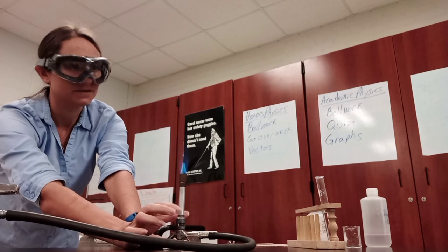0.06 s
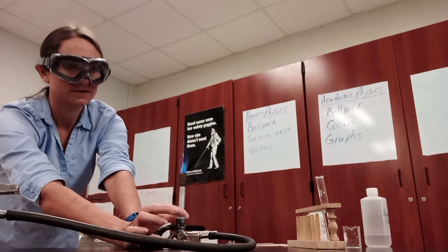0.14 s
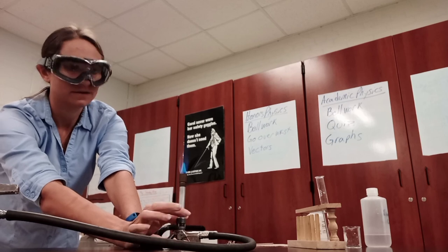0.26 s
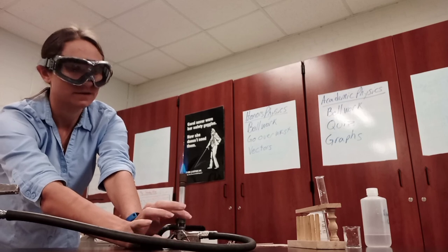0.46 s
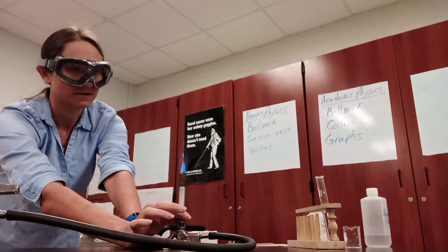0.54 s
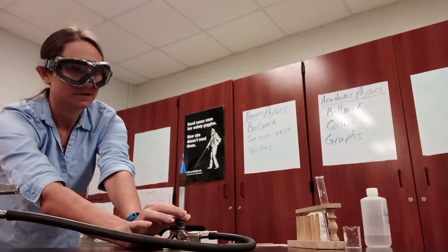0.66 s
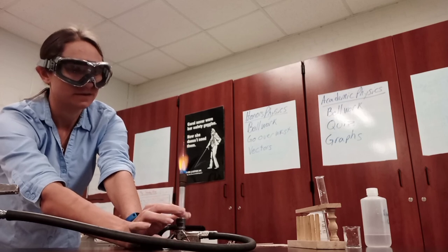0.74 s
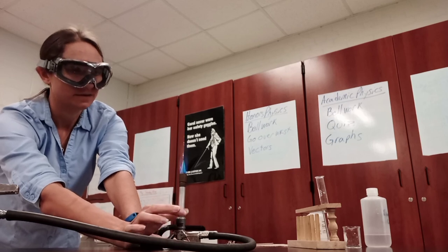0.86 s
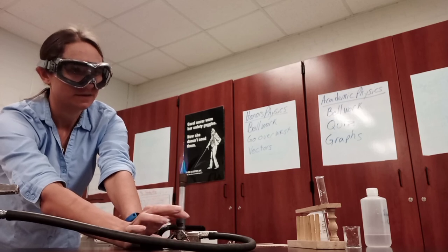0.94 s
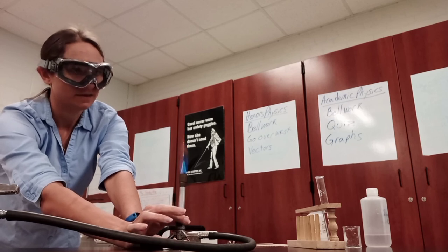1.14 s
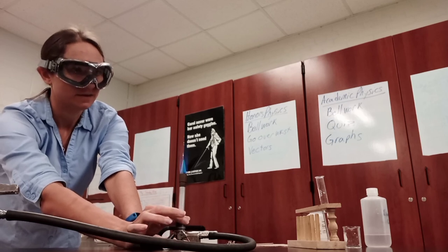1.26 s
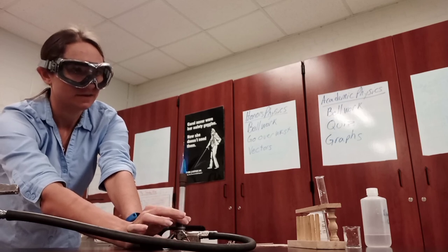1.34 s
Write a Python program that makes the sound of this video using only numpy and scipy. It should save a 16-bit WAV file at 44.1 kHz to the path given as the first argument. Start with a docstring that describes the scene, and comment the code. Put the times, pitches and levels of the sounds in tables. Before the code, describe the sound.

A metal gas burner is adjusted by hand: its base knocks on a bench, the collar rasps and squeaks in quick jerks, then softer knocks and one last squeak follow, close by in a hard room with faint hum.

```python
"""Out of faint crackle, a gas burner's base knocks on a laboratory bench as a hand turns its collar.
The dry metal thread rasps in quick jerks that set the tube ringing, then catches in short stick-slip
squeaks and dull chirps. More knocks and scuffs of the base follow, and one last squeak.
A hard room rings after the burner, over a low hum and a thin steady whistle."""
import sys
import numpy as np
from scipy import signal
from scipy.fft import rfft, irfft
from scipy.io import wavfile
from scipy.ndimage import uniform_filter1d

SR = 44100
rng = np.random.default_rng(int(sys.argv[2]) if len(sys.argv) > 2 else 0)


def store_pcm(level_fs):
    """Save levels as 16-bit WAV."""
    pcm = np.round(np.clip(level_fs, -1, 1) * 32767).astype(np.int16)
    wavfile.write(sys.argv[1], SR, np.atleast_2d(pcm).T)


N = 61739


def amp(db):
    """Decibels to gain."""
    return 10 ** (np.asarray(db) / 20)


def unit_rms(x):
    """Scales to an rms of one."""
    return x / np.sqrt(np.mean(x ** 2) + 1e-20)


def curve_at(points, hz):
    """Reads a curve on a log-frequency axis."""
    freqs, values = np.transpose(points)
    return np.interp(np.log(hz + 1), np.log(freqs + 1), values)


def fader(points):
    """Gain that rides through timed level points."""
    return amp(np.interp(np.arange(N) / SR, *np.transpose(points)))


def add(mix, start_s, sound):
    """Mixes a sound in at its start time."""
    part = mix[max(round(start_s * SR), 0):][:len(sound)]
    part += sound[:len(part)]


def impulse_response(eq, size=2048):
    """Minimum-phase ring of an EQ curve, with unit energy."""
    log_gain = np.log(amp(curve_at(eq, abs(np.fft.fftfreq(size, 1 / SR)))))
    response = np.fft.ifft(np.exp(signal.hilbert(log_gain).conj())).real[:size // 2]
    return response / np.linalg.norm(response)


def noise(eq):
    """Steady noise coloured by an EQ curve."""
    gain = amp(curve_at(eq, np.fft.rfftfreq(N, 1 / SR)))
    return unit_rms(irfft(rfft(rng.standard_normal(N)) * gain, N))


def wobble(count, size=40):
    """Smooth random motion."""
    return unit_rms(uniform_filter1d(uniform_filter1d(rng.standard_normal(count), size), size))


# Hollow body and bright grit of the rasp: freq_hz, gain_db
BODY_EQ = [(30, -62.5), (150, -22), (430, -12.5), (620, 4), (790, -0.5), (930, 7.5), (1050, 5),
           (1150, -6.5), (1360, 1), (1650, -10.5), (1920, -4.5), (2800, -25), (4500, -28.5)]
GRIT_EQ = [(100, -49.5), (1000, -29.5), (2500, -10.5), (3900, -5.5), (4400, 3.5), (5100, -3.5), (5500, 5.5),
           (5900, -0.5), (6500, -0.5), (7100, -15.5), (8200, -35), (8900, -4), (10000, -9.5), (11300, 0.5),
           (11950, -20.5), (12400, -8.5), (13200, -29.5), (15000, -14.5), (15700, -4), (16300, -3)]
# Jerks and one long drag of the thread: start_s, length_s, body_db, grit_db
THREAD_JERKS = [(0.271, 0.0049, -44, -44.5), (0.314, 0.015, -39.5, -31.5), (0.368, 0.01, -56.5, -50),
                (.37, .18, -56, -51), (0.4038, 0.014, -40, -33.5), (.420, 0.0091, -30, -35.5),
                (0.437, 0.0096, -37.5, -31.5), (0.4501, 0.0088, -28.5, -31.5), (0.4652, 0.013, -37, -32),
                (0.487, 0.0089, -40, -47.5), (0.502, 0.013, -67, -48), (0.526, .007, -65.5, -45),
                (0.551, 0.014, -49, -46)]
def thread_rasps():
    """Each jerk is a cluster of tiny slips shaking the metal; the body's note sags as the jerk slows."""
    slips_per_s, spread_db = 8000, 2
    rise, fall, sag = 0.35, 0.6, 0.095  # shares of the length (rise, fall) and of the pitch (sag)
    out, n = np.zeros(N), np.arange(SR // 4)
    body_ring, grit_ring = impulse_response(BODY_EQ), impulse_response(GRIT_EQ)
    for start_s, length_s, body_db, grit_db in THREAD_JERKS:
        slipping = rng.random(len(n)) < slips_per_s / SR
        strength = amp(spread_db * rng.standard_normal(len(n)))
        direction = rng.choice([-1, 1], len(n))
        progress = n / SR / length_s
        envelope = np.clip(np.minimum(progress / rise, (1 - progress) / fall), 0, 1)
        slips = slipping * direction * strength * envelope
        speed = 1 + sag * (1 - 2 * np.minimum(progress, 1))
        body = np.interp(np.cumsum(speed), n, signal.fftconvolve(slips, body_ring)[:len(n)])
        grit = signal.fftconvolve(slips, grit_ring)
        for layer, level_db in ((body, body_db), (grit, grit_db)):
            makeup_gain = np.sqrt(length_s * SR / 2 / (np.sum(layer ** 2) + 1e-20))
            add(out, start_s, amp(level_db) * makeup_gain * layer)
    return out


def tube_ring(scrape):
    """The scrape sets the burner tube ringing in a cluster of close modes."""
    centre_hz, width_hz, t60_s, send_db = 4475, 280, 0.6, -20
    t = np.arange(SR // 2) / SR
    band = np.exp(-((np.fft.rfftfreq(len(t), 1 / SR) - centre_hz) / width_hz) ** 2)
    cluster = irfft(rfft(rng.standard_normal(len(t))) * band, len(t))
    response = cluster * amp(-60 * t / t60_s)
    return amp(send_db) * signal.fftconvolve(scrape, response / np.linalg.norm(response))[:N]


# Side tones round a squeak: pitch_multiple, chatter_multiple
SIDE_TONES = [(0, 1), (1, 1), (2, 1), (3, -1), (3, 1), (4, -1)]
# Balance of those side tones: gain_db
SIDE_GAINS = [-3, -2, 0, -2.5, -5, -15]
# Catches of the thread: peak_s, half_length_s, pitch_hz, level_db, octave_db, chatter_db, chatter_hz
THREAD_SQUEAKS = [(0.369, 0.0015, 4910, -39, -7, -18.5, 1617),
                  (0.3848, 0.0016, 4910, -37.5, -9, -14.5, 1672),
                  (0.396, 0.0029, 4530, -38.5, -3.5, -13, 1974),
                  (0.474, 0.0021, 4920, -36, -9.5, -21.5, 1739),
                  (0.4872, 0.0036, 4432, -34, 1.5, -12, 1762), (.504, 0.0029, 4466, -34.5, 5, -19, 1830),
                  (0.5093, 0.0042, 4290, -23.5, -12, -12.5, 1779), (0.526, .0028, 4393, -31, -6, -6, 1598),
                  (0.53, .0025, 4330, -33.5, -18, -7, 1625), (0.5446, 0.0032, 4430, -43, -27, -12.5, 1573),
                  (0.552, 0.0029, 4408, -40, -26.5, -5, 1464), (1.1443, 0.0029, 4344, -39, -4, -25, 1632),
                  (1.1473, 0.0035, 4314, -31, -22, -19, 1517)]
def thread_squeaks():
    """Brief stick-slip tones sag as the thread grips; a second, slower vibration adds side tones."""
    glide_depth, jitter_depth, chatter_drift, third_db = 0.011, 0.0063, 0.036, -5.5
    out, t = np.zeros(N), np.arange(-SR // 50, SR // 50) / SR
    for peak_s, half_s, pitch_hz, level_db, octave_db, chatter_db, chatter_hz in THREAD_SQUEAKS:
        glide = glide_depth * (np.exp(np.minimum(-t / half_s, 2)) - 1)
        pitch = pitch_hz * (1 + glide + jitter_depth * wobble(len(t)))
        phase = 2 * np.pi * np.cumsum(pitch) / SR
        chatter_rate = chatter_hz * (1 + chatter_drift * wobble(len(t)))
        chatter_phase = 2 * np.pi * np.cumsum(chatter_rate) / SR
        sides = sum(amp(db) * np.sin(k * phase + m * chatter_phase)
                    for (k, m), db in zip(SIDE_TONES, SIDE_GAINS))
        roughness = sides + amp(third_db) * np.sin(3 * phase)
        swell = np.exp(-(t / half_s) ** 2)
        tone = np.sin(phase) + amp(octave_db) * np.sin(2 * phase) + amp(chatter_db) * swell * roughness
        add(out, peak_s + t[0], amp(level_db) * swell * tone)
    return out


# Dull chirps and groans: peak_s, half_length_s, pitch_hz, level_db
COLLAR_CHIRPS = [(0.2671, .0034, 340, -36.5), (0.317, 0.0028, 1576, -36), (.321, 0.0035, 1028, -34),
                 (.326, 0.0049, 555, -35.5), (1.0355, 0.0022, 1554, -45), (1.147, 0.0024, 1500, -42.5)]
def collar_chirps():
    """The slower vibrations sound alone as the metal binds."""
    out, t = np.zeros(N), np.arange(-SR // 50, SR // 50) / SR
    for peak_s, half_s, pitch_hz, level_db in COLLAR_CHIRPS:
        swell = np.exp(-(t / half_s) ** 2)
        add(out, peak_s + t[0], amp(level_db) * swell * np.sin(2 * np.pi * pitch_hz * t))
    return out


def struck_modes(modes, t, rise_s):
    """Decaying sines of alternating polarity under a softened attack."""
    ringing = sum((-1) ** k * amp(gain_db - 60 * t / t60_s) * np.sin(2 * np.pi * pitch_hz * t)
                  for k, (pitch_hz, gain_db, t60_s) in enumerate(modes))
    return (1 - np.exp(-t / rise_s)) * ringing


# Low, middle and high modes of the base on the bench: pitch_hz, gain_db, t60_s
BOOM_MODES = [(202.2, -13.5, 0.19), (240, -13, 0.12), (281, -1.5, 0.091), (372, -13, 0.061)]
THUD_MODES = [(375, -9.5, 0.06), (457.2, -6, 0.11), (535.6, -1, 0.056), (609, -4, 0.071)]
CLACK_MODES = [(630, -1, 0.015), (775, -9.5, 0.038), (884, -11, 0.045), (1014, -7, 0.028),
               (1380, -5, 0.023), (1550, -15, 0.066), (1930, -7, 0.012)]
# Metallic edge of the attack: freq_hz, gain_db
TICK_EQ = [(30, -38.5), (300, -18.5), (1500, 9.5), (2600, -1), (3900, 4), (4800, -6.5), (6500, -11),
           (7600, -33.5), (9400, -15.5), (11300, -16), (13500, -30), (16000, -16.5)]
# Hits and their layer gains: start_s, boom_db, thud_db, clack_db, tick_db
BASE_HITS = [(0.2322, -59, -30.5, -34.5, -40.5), (.238, -33, -36, -53, -68), (0.2502, -34, -40, -49, -72),
             (0.2639, -33.5, -44.5, -54, -64), (0.2725, -35, -38, -33, -43.5), (.290, -34, -47.5, -45, -71),
             (0.316, -46, -38, -36, -57), (0.368, -69, -54, -38, -60), (0.9335, -70, -68, -42.5, -43.5),
             (0.9469, -70, -56, -37.5, -45), (.962, -57, -48, -55, -74), (0.9714, -54, -40, -48, -54.5),
             (.986, -42, -49, -74, -91), (1.001, -49, -51.5, -76, -84), (1.019, -50.5, -57, -57, -74),
             (1.16, -42, -46, -60.5, -73), (1.172, -50.5, -47, -52.5, -63), (1.189, -44.5, -59, -65, -84.5),
             (1.233, -60.5, -53.5, -60, -80), (1.2665, -65.5, -49, -50.5, -73)]
def base_knocks():
    """Each knock sounds the base's three groups of modes in its own blend, with a metallic tick."""
    out, t = np.zeros(N), np.arange(SR // 4) / SR
    boom = struck_modes(BOOM_MODES, t, rise_s=0.0058)
    thud = struck_modes(THUD_MODES, t, rise_s=0.0029)
    clack = struck_modes(CLACK_MODES, t, rise_s=0.00035)
    tick_ring, tick_decay_s = impulse_response(TICK_EQ), 0.003
    for start_s, boom_db, thud_db, clack_db, tick_db in BASE_HITS:
        add(out, start_s, amp(boom_db) * boom + amp(thud_db) * thud + amp(clack_db) * clack)
        burst = 0.5 * rng.standard_normal(len(t)) * np.exp(-t / tick_decay_s)
        add(out, start_s, amp(tick_db) * signal.fftconvolve(burst, tick_ring))
    return out


# Fader ride of the scuff: time_s, level_db
SCUFF_RIDE = [(0, -81), (.06, -68), (.1, -77), (.17, -73), (0.201, -78), (0.253, -43.5), (.33, -50.5),
              (.39, -80), (.6, -85), (.92, -85.5), (0.978, -54), (1.05, -63), (1.13, -63), (1.17, -50.5),
              (1.21, -67.5), (1.28, -57), (1.39, -83)]
# Hollow colour of the scuff: freq_hz, gain_db
SCUFF_EQ = [(30, -44.5), (300, -19), (450, -7), (580, 2), (700, -7), (950, -11.5), (1200, -29),
            (2500, -32.5), (8000, -66)]
def base_scuff():
    """The base shifts on the bench under the hand, with a grainy rub."""
    grain_db = 3.5
    grain = amp(grain_db * wobble(N, size=200))
    return fader(SCUFF_RIDE) * unit_rms(grain * noise(SCUFF_EQ))


# Reverb decay: freq_hz, t60_s
REVERB_DECAY = [(120, 0.41), (300, 0.6), (800, 0.28), (1800, 0.57), (4400, 0.52), (9000, 0.38),
                (16000, 0.2)]
# Reverb colour: freq_hz, gain_db
REVERB_EQ = [(100, -3), (500, -4), (1500, -4), (4400, -9.5), (9000, -11.5), (16000, -13.5)]
def room_reverb(source):
    """Dense reflections, strongest from the nearby bench and cabinets; each band dies at its own speed."""
    predelay_s, early_boost, early_decay_s = 0.0058, 3.7, 0.012
    t = np.arange(SR) / SR
    reflections = rng.standard_normal(SR) * (1 + early_boost * np.exp(-t / early_decay_s))
    hz, frame_s, bands = signal.stft(reflections, SR, nperseg=256)
    decay = amp(-60 * frame_s / curve_at(REVERB_DECAY, hz)[:, None])
    tail = signal.istft(bands * decay, SR, nperseg=256)[1][:SR] * (t > predelay_s)
    spectrum = rfft(tail)
    spectrum /= np.sqrt(uniform_filter1d(abs(spectrum) ** 2, size=200))  # flatten before the EQ
    spectrum *= amp(curve_at(REVERB_EQ, np.fft.rfftfreq(SR, 1 / SR)))
    return signal.fftconvolve(source, irfft(spectrum))[:N]


# Colour of a click: freq_hz, gain_db
CLICK_EQ = [(40, -3.5), (150, -2), (600, 8), (1300, 6.5), (2300, 7), (4000, 1.5), (5800, -3.5),
            (7300, -26.5), (12000, -38), (16000, -44)]
# Small dry clicks: start_s, click_db, rebound_db
DRY_CLICKS = [(.0072, -51, -48), (0.024, -49, -47), (.039, -51, -44), (0.0787, -48, -49), (.102, -48, -53),
              (0.1365, -51.5, -50.5), (0.1595, -49, -43), (0.171, -47.5, -44), (0.2092, -48, -53),
              (0.214, -47.5, -48), (0.2277, -39, -49), (0.2728, -30, -36.5), (.6855, -49.5, -63),
              (0.735, -48.5, -70), (0.753, -43.5, -70.5), (1.121, -43, -59), (1.2064, -48, -48),
              (1.289, -44, -66), (1.3154, -43, -63), (1.3779, -48, -62)]
def crackle():
    """Dry clicks, each with a soft rebound and a short gritty tail; fainter ones fall between them."""
    faint_per_s, faint_db = 40, -65
    rebound_peak_s, tail_db, tail_decay_s = 0.00059, -29.5, 0.019
    clicks = amp(faint_db) * (rng.random(N) < faint_per_s / SR) * rng.standard_normal(N)
    rebounds, t = np.zeros(N), np.arange(SR // 20) / SR
    rise = (t / rebound_peak_s) ** 2
    for start_s, click_db, rebound_db in DRY_CLICKS:
        tail = amp(tail_db) * rng.standard_normal(len(t)) * np.exp(-t / tail_decay_s)
        add(clicks, start_s, amp(click_db) * ((t == 0) + tail))
        add(rebounds, start_s, amp(rebound_db) * rise * np.exp(1 - rise))
    click_ring = impulse_response(CLICK_EQ)
    snaps = signal.fftconvolve(clicks, click_ring / abs(click_ring).max())[:N]
    low_cut = signal.butter(2, 122, "high", fs=SR, output="sos")
    return signal.sosfilt(low_cut, rebounds) - snaps


# Fader ride of the rustle: time_s, level_db
RUSTLE_RIDE = [(0, -58.5), (0.041, -58), (0.086, -66.5), (0.114, -61.5), (0.139, -68), (.17, -56),
               (.2, -61.5), (.27, -58), (0.359, -64.5), (.5, -63.5), (0.619, -76), (0.691, -73),
               (.75, -76.5), (.91, -80), (0.999, -61.5), (1.08, -74), (1.18, -61), (1.25, -76),
               (1.302, -83), (1.39, -75)]
# Dark colour of the rustle: freq_hz, gain_db
RUSTLE_EQ = [(20, -34), (50, -30.5), (85, -7.5), (125, 4), (170, -5.5), (300, -8), (600, -14.5),
             (1200, -24.5), (3000, -33.5), (7000, -51.5), (16000, -52.5)]
def handling_rustle():
    """Low handling noise swells and fades."""
    return fader(RUSTLE_RIDE) * noise(RUSTLE_EQ)


# Hum and whistle: pitch_hz, width_hz, level_db
STEADY_TONES = [(120, 7.2, -82), (193.4, 43, -82), (1674, 37, -79.5), (5750, 140, -85)]
# Colour of the room air: freq_hz, gain_db
AIR_EQ = [(20, -25), (60, -11.5), (130, -7), (210, 4.5), (330, -11.5), (800, -26), (1700, -16), (2800, -27),
          (4300, -22), (6000, -22), (8000, -34.5), (16000, -25)]
def room_tone():
    """Narrow bands of noise hum and whistle over a bed of air."""
    air_db = -75.5
    tones, hz = np.zeros(N), np.fft.rfftfreq(N, 1 / SR)
    for pitch_hz, width_hz, level_db in STEADY_TONES:
        band = 1 / (1 + (2 * (hz - pitch_hz) / width_hz) ** 2)
        tones += amp(level_db) * unit_rms(irfft(rfft(rng.standard_normal(N)) * band, N))
    return tones + amp(air_db) * noise(AIR_EQ)


def scene():
    """Mono mix; only the knocks, rasps, squeaks and chirps feed the reverb."""
    scrape = thread_rasps()
    burner = base_knocks() + scrape + thread_squeaks() + collar_chirps()
    foreground = burner + tube_ring(scrape) + room_reverb(burner)
    bed = crackle() + room_tone() + handling_rustle() + base_scuff()
    return (foreground + bed)[None]


def record(dry):
    """A steep high cut trims the very top of the treble."""
    high_cut = signal.firwin(511, cutoff=15850, window=("kaiser", 9), fs=SR)
    return signal.oaconvolve(dry, high_cut[None], "same")


dry = scene()
out = record(dry)
store_pcm(out)
```